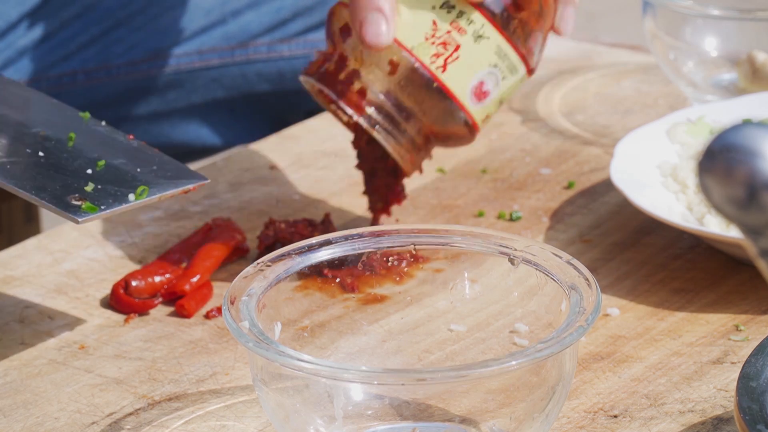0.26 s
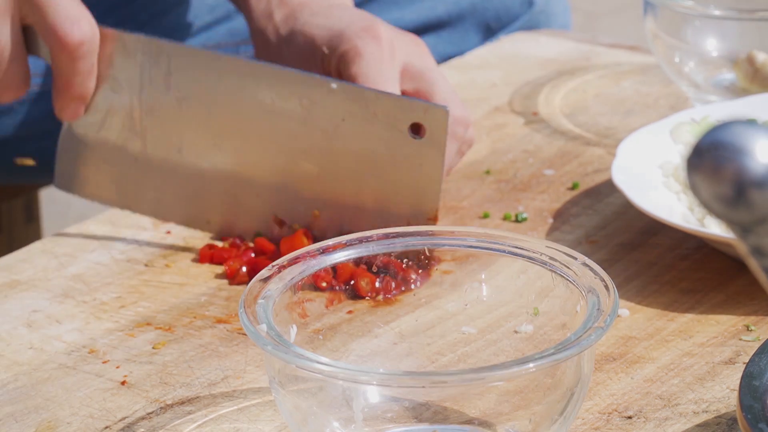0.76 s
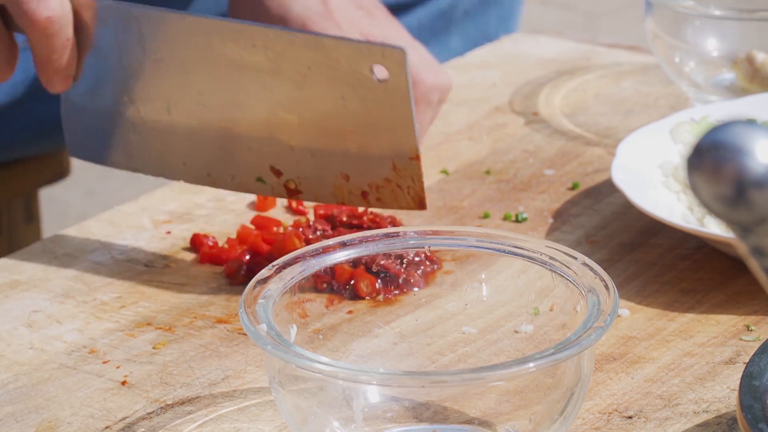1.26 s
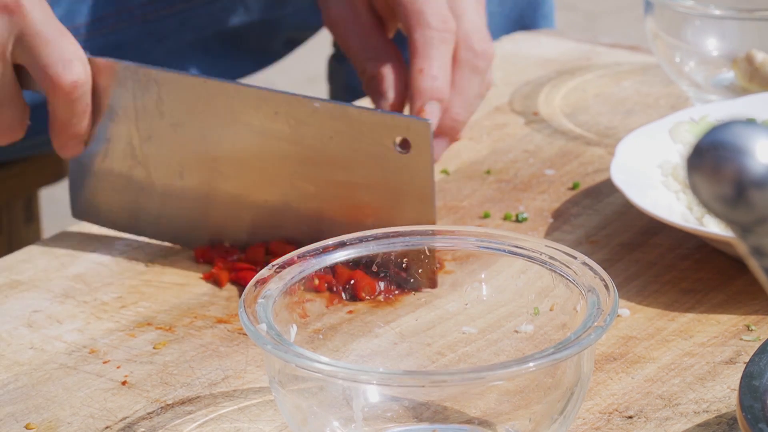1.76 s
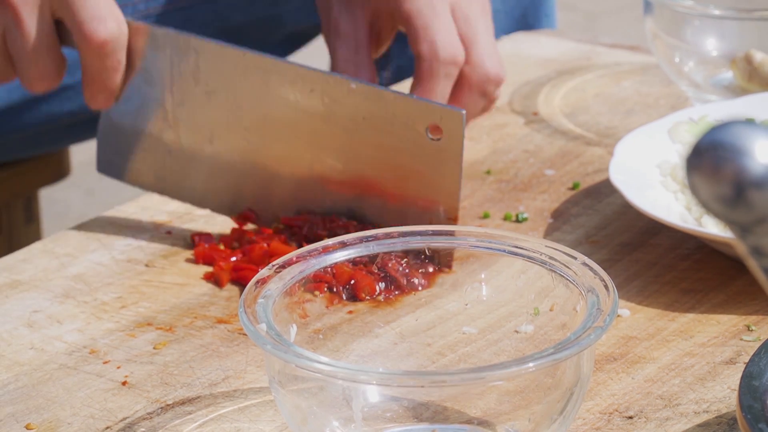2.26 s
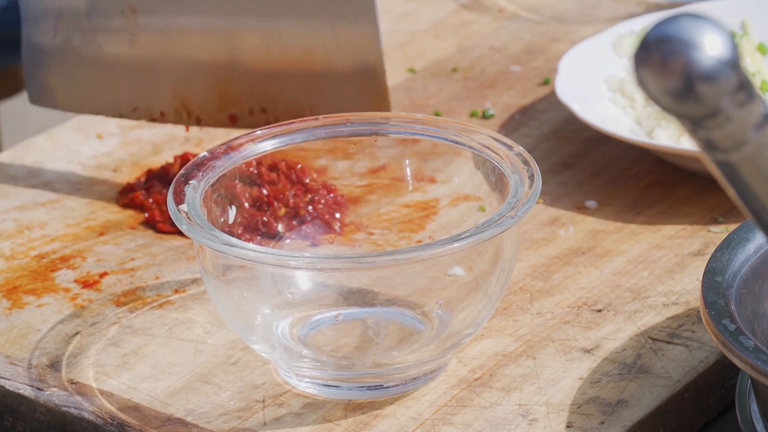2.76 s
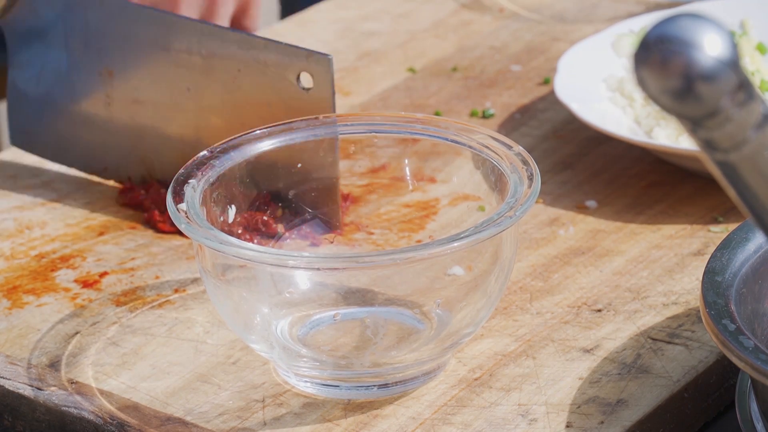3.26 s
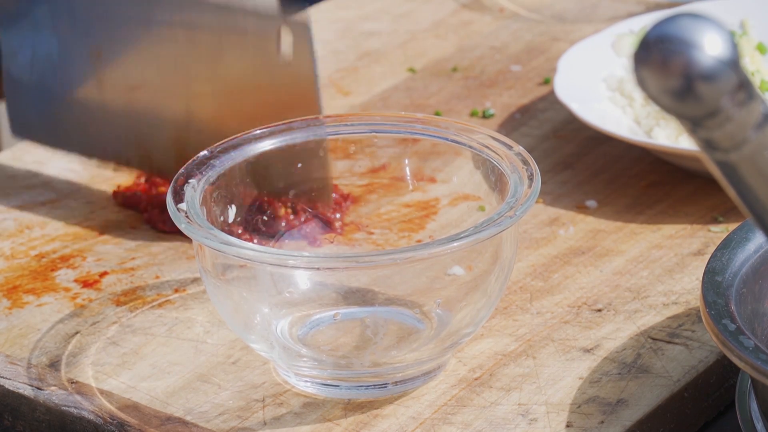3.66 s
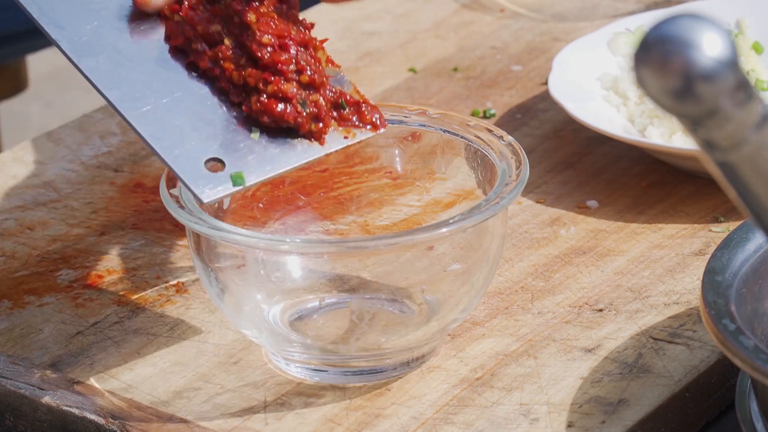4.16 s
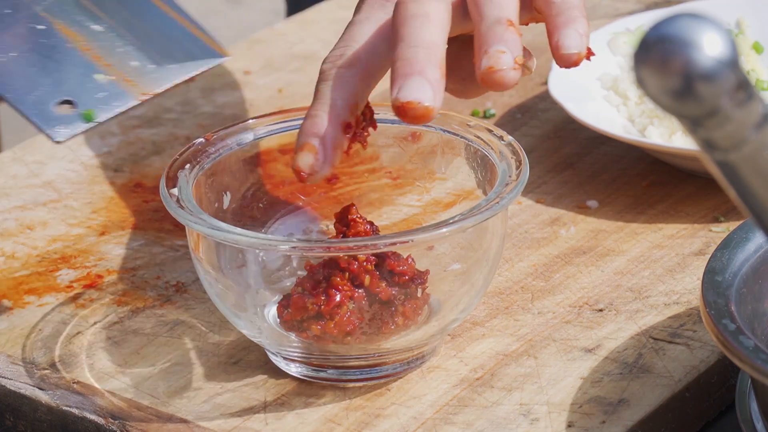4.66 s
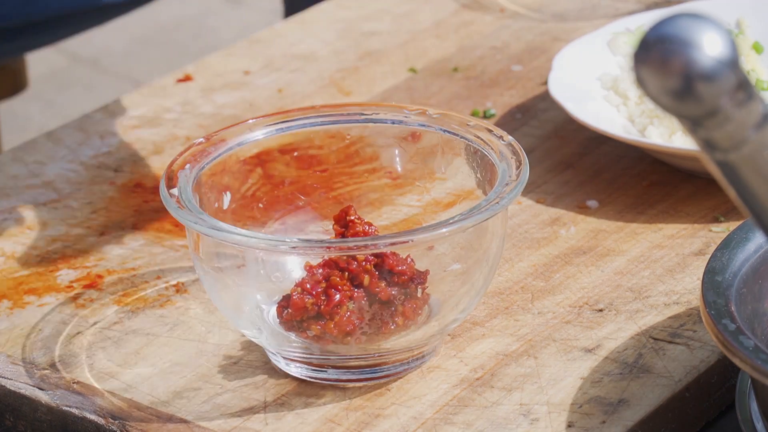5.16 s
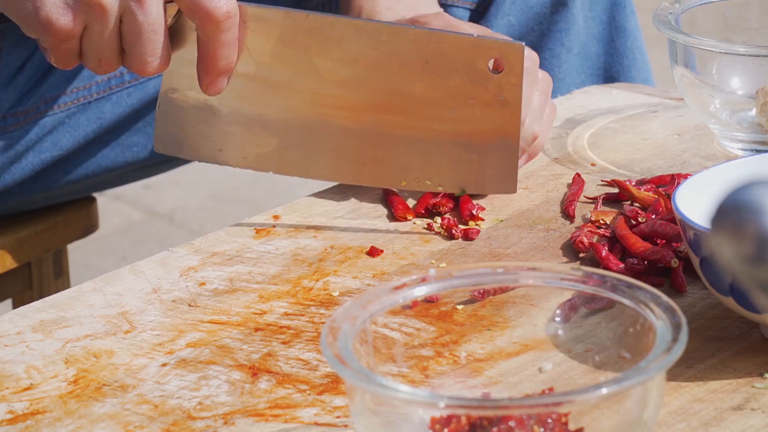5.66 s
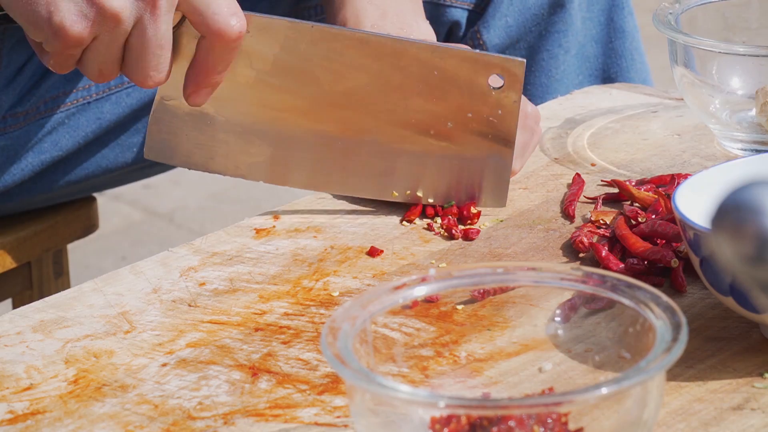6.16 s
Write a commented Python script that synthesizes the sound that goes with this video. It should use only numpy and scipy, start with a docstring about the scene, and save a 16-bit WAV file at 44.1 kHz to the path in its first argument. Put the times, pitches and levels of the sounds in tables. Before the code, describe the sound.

Close loud cleaver chops on a thick wooden board with wet crunches and rattling dishes, wind rumble, a short scrape, then a brittle snap.

```python
"""Outdoors, a jar is knocked twice to free its chili paste: glass and wood modes ring briefly. A steel cleaver
touches and rings, then chops the paste on a thick wooden board: decaying modes and noise bursts, echoed by a yard,
with ringing dishes, a thin clink and wet crackles of noise. Later the blade taps and scrapes the board (modulated
noise) and cuts a dried chili, whose pod snaps. Throughout, coloured noise makes wind and air; far birds call as
gliding sines, and stray clicks sound. The loudest swings overload the microphone."""
import sys
import numpy as np
from scipy import signal
from scipy.fft import rfft, irfft, next_fast_len
from scipy.io import wavfile

SR = 44100
rng = np.random.default_rng(int(sys.argv[2]) if len(sys.argv) > 2 else 0)


def dump_mix(stems):
    """Bounce the given channels to the path in sys.argv[1] as a 16-bit WAV at rate SR."""
    frames = np.atleast_2d(stems).T  # one column per channel
    limited = np.clip(frames, -1, 1)  # hard clip at full scale
    pcm = np.round(limited * 32767).astype(np.int16)
    wavfile.write(sys.argv[1], SR, pcm)


N = 282681
TIME = np.arange(N) / SR   # time in the scene [s]
AGE = TIME[:SR // 2]       # time since the start of one event [s]

# dishes standing on the board: (frequency [Hz], relative level [dB], t60 [s])
DISH_MODES = [(240.3, -28, 0.22), (383, -31.5, 0.27), (447.5, -20.5, 0.13), (575, -28, 0.25),
              (787, -26, 0.18), (853, -26, 0.59), (987, -23.5, 0.19), (1260, -30.5, 0.46),
              (1520, -42.5, 0.9), (1613, -30.5, 1.1), (1725, -31.5, 0.34), (2120, -39.5, 0.19)]
# spectrum of wet flesh and fine ticks: (frequency [Hz], relative density [dB per Hz])
CRUNCH = [(800, -19), (2000, 7), (4000, 0), (8000, 3), (11000, -6.5), (15000, -1)]
# spectrum of a dull crack: (frequency [Hz], relative density [dB per Hz])
CRACK = [(500, 4.5), (1500, 11), (3000, 3.5), (5000, -5), (8500, -15), (11000, -19), (15000, -43)]


def from_db(db):
    """Amplitude gain is the exponential of a level: 20 dB is a factor of ten."""
    return 10 ** (np.asarray(db) / 20)


def rms_one(x):
    """Normalization to unit mean power."""
    return x / np.sqrt(np.mean(x ** 2) + 1e-20)


def gains_in_time(rows):
    """Envelopes: each level column, interpolated linearly in dB, becomes a gain per sample."""
    s, *columns = np.transpose(rows)
    return [from_db(np.interp(TIME, s, column)) for column in columns]


def coloured(x, spectrum):
    """Linear filtering: weights the Fourier components by a spectrum drawn over log frequency; rms 1."""
    hz, db = np.transpose(spectrum)
    size = next_fast_len(len(x))
    bins = np.maximum(np.arange(size // 2 + 1) * SR / size, 1)
    weight = from_db(np.interp(np.log(bins), np.log(hz), db))
    return rms_one(irfft(rfft(x, size) * weight, size)[:len(x)])


def noise(spectrum, size):
    """Stationary random noise with a given spectrum; rms 1."""
    return coloured(rng.standard_normal(size), spectrum)


def grains(size, spread_db):
    """Fracture as impulsive noise: short runs of noise of very uneven strength; rms 1."""
    strength = np.repeat(rng.standard_normal(size // 16 + 1), 16)[:size]   # new strength every 16 samples
    strength_db = min(spread_db, 8) * np.clip(strength, -2, 2)
    return rms_one(rng.standard_normal(size) * from_db(strength_db))


def decay(t60):
    """Exponential damping: falls 60 dB in t60 seconds."""
    return np.exp(-np.log(1000) * AGE / max(t60, 1e-3))


def struck(modes, uneven_db, detune):
    """Modal synthesis: a blow excites damped sines whose strength and tuning depend on where it lands."""
    chance = rng.standard_normal((len(modes), 2))
    out = np.zeros(len(AGE))
    for k, ((hz, db, t60), (stronger, sharper)) in enumerate(zip(modes, chance)):
        sine = np.sin(2 * np.pi * hz * (1 + detune * sharper) * AGE)
        polarity = (-1) ** k
        out += polarity * from_db(db + uneven_db * stronger) * decay(t60) * sine
    return out


def add(track, s, sound):
    """Superposition: mixes in a sound that starts at s seconds."""
    start = max(round(s * SR), 0)
    track[start:start + len(sound)] += sound[:len(track) - start]


def yard(x, level_db):
    """Diffuse reflection from walls some metres away: convolution with shaped noise of unit energy."""
    # spectrum of the echo: (frequency [Hz], relative density [dB per Hz])
    echo_spectrum = [(100, 4), (250, 2), (450, -3.5), (800, -1.5), (1300, -4.5), (2000, -0.5), (3500, -8),
                     (7000, -12.5), (15000, -5)]
    # the echo starts strong, swells again from the far walls and dies away: (delay [s], relative level [dB])
    echo_shape = [(0.004, 5.5), (0.014, -1.5), (0.03, 1), (0.046, 3), (0.08, -2.5), (0.13, -14),
                  (0.2, -27.5), (0.45, -54)]
    s, db = np.transpose(echo_shape)
    response = noise(echo_spectrum, len(AGE)) * from_db(np.interp(AGE, s, db))
    return from_db(level_db) * signal.fftconvolve(x, response / np.linalg.norm(response))[:len(x)]


def crackle():
    """Wet fracture: a short decaying burst of grains from skins and seeds; rms 1 before its decay."""
    size = SR // 8
    return coloured(grains(size, spread_db=4.5), CRUNCH) * decay(0.038)[:size]


def chopping(crunch_s=.01, bite_s=0.00048, settle_s=0.0042, settle_db=-4):
    """Impact excitation: flesh crunches, wood cracks and thuds, dishes shake, and the blade lifts off."""
    # chops: (time [s], force [dB], flesh under the edge [dB])
    chops = [(0.7559, -0.5, 12.5), (0.976, 0.5, 2.5), (1.183, -2.5, 11), (1.402, -1.5, 12),
             (1.6219, -1, 7.5), (1.8294, 0, 5.5), (2.0513, -3.5, 0), (2.265, -2, 0), (2.496, -2, 2),
             (2.6688, -2, -3), (2.888, -1, -0.5), (3.1015, -2, -14), (3.3207, -3, 3), (3.534, -1.5, 1.5),
             (3.7466, 0, 3), (3.9481, 0.5, -5), (4.1572, 6, 3.5)]
    # the board's deep modes: (multiple of the board pitch, relative level [dB], t60 [s])
    thud_modes = [(0.518, -16, 0.13), (0.998, 2, 0.04), (1.222, -2.5, 0.031)]
    # the board's upper modes: (frequency [Hz], relative level [dB], t60 [s])
    knock_modes = [(787.5, 0.5, 0.022), (1054, -3, 0.019), (1285, -4, 0.02), (1651, -14.5, 0.014),
                   (2085, -20, 0.026), (2645, -27, 0.02)]
    # the whole board bumping on its support: (frequency [Hz], relative level [dB], t60 [s])
    bump_modes = [(81.5, -17, 0.032), (131, -24.5, .06)]
    board_hz, board_scatter = 456, 0.0086   # mean pitch, and its share of change from spot to spot
    # levels at force 0 dB; flesh lowers the knock and raises the crunch
    thud_db, knock_db, crack_db, crunch_db, echo_db, dishes_db = -1, 0, -12, -33, -6.5, -1.5
    cushion = 0.21   # dB of knock lost per dB of flesh
    lift_s, lift_db = .049, -42.5   # the blade comes unstuck from the paste this long after each chop
    chopping_ends_s = 4.1592
    out = np.zeros(N)
    for s, force_db, flesh_db in chops:
        pitch_hz = board_hz * (1 + board_scatter * rng.standard_normal())
        deep_modes = [(k * pitch_hz, db, t60) for k, db, t60 in thud_modes]
        thud = -struck(deep_modes, uneven_db=1.2, detune=.008)
        knock = struck(knock_modes, uneven_db=2, detune=.04)
        # one end of the edge lands first, the rest settles a moment later
        settling = from_db(settle_db) * struck(knock_modes, uneven_db=3.0, detune=0.022)
        add(knock, settle_s * rng.uniform(0.714, 1.27), settling)
        onset = 1 - np.exp(-AGE / bite_s)
        board = (from_db(thud_db) * thud + from_db(knock_db - cushion * flesh_db) * knock) * onset
        blow = board + from_db(crack_db) * noise(CRACK, len(AGE)) * decay(0.016)
        dishes = from_db(dishes_db) * struck(DISH_MODES, uneven_db=5.0, detune=0.002)
        bump = struck(bump_modes, uneven_db=3, detune=.08)
        add(out, s, from_db(force_db) * (blow + yard(blow, level_db=echo_db) + dishes + bump))
        # the crunch dips, then peaks as the edge reaches the wood
        pressing = np.interp(AGE, [0, crunch_s / 2, crunch_s, crunch_s + 0.0023], [0.38, 0.025, 1.62, 0])
        crunch = pressing * coloured(grains(len(AGE), spread_db=4.5), CRUNCH)
        add(out, s - crunch_s, from_db(crunch_db + flesh_db) * crunch)
        add(out, s + lift_s, from_db(lift_db + force_db) * crackle())
    # all sound of the chopping breaks off abruptly just after the last chop begins
    return out * np.clip((chopping_ends_s - TIME) / .001, 0, 1)


def steel(tick_db=-20, sizzle_db=0):
    """Free vibration of a plate: the blade rings as it is touched; a thin clink adds a bright sizzle."""
    # touches: (time [s], blade level [dB], its two lowest modes [dB re blade], dishes level [dB])
    touches = [(0.627, -25.5, -14, -8.5), (0.755, -18, -1, -22), (0.8058, -4, 0, -17)]
    # cleaver blade: (frequency [Hz], relative level [dB], t60 [s])
    blade_modes = [(2385, -43, 0.2), (2766, -14, 0.25), (2917, -16.5, 0.5), (3983, -4.5, 0.06),
                   (5360, -28, 0.11), (5895, -24, 0.061), (7680, -39.5, 0.13), (8586, -41, 0.14),
                   (9250, -33.5, 0.06), (10970, -30, 0.048)]
    # a thin bright clink of steel: (time [s], level [dB])
    clink = (1.537, -23.5)
    # its modes: (frequency [Hz], relative level [dB], t60 [s])
    clink_modes = [(5280, -11, 0.37), (5700, -2, 0.14), (6100, -18, 0.15), (6650, -4, 0.15),
                   (7250, -9, 0.17), (8100, -1, 0.11), (8640, -1, 0.073), (12000, -3, 0.079),
                   (13100, -7, 0.09)]
    out = np.zeros(N)
    for s, blade_db, low_db, dishes_db in touches:
        tick = from_db(tick_db) * noise(CRUNCH, len(AGE)) * decay(0.019)
        low = struck(blade_modes[:2], uneven_db=.3, detune=0)
        high = struck(blade_modes[2:], uneven_db=.3, detune=0)
        add(out, s, from_db(blade_db) * (from_db(low_db) * low + high + tick))
        add(out, s, from_db(dishes_db) * struck(DISH_MODES, uneven_db=0, detune=0.00054))
    clink_s, clink_db = clink
    sizzle = noise([(4600, -41), (5600, 3), (8500, -6), (15000, -13)], len(AGE)) * decay(0.16)
    ring = struck(clink_modes, uneven_db=1, detune=0)
    add(out, clink_s, from_db(clink_db) * (ring + from_db(sizzle_db) * sizzle))
    return out


def jar(lead_s=0.0037, lag_s=0.00313, thud_db=0, bounce_s=0.01196, bounce_db=-22, squelch_db=-13):
    """Coupled impact: paste shifts, the rim ticks, the jar's weight thuds into the wood and bounces once."""
    # knocks on the board: (time [s], rim level [dB], paste shifting inside [dB])
    knocks = [(0.189, -12, -23.5), (0.4012, -14.5, -35.5)]
    # the jar's glass rim: (frequency [Hz], relative level [dB], t60 [s])
    rim_modes = [(1150, -2, 0.0086), (1372, -1, 0.044), (1700, 3, 0.016), (2250, -1.5, 0.022),
                 (3250, -8, 0.015)]
    # the board under the jar: (frequency [Hz], relative level [dB], t60 [s])
    jar_thud_modes = [(239, -16.5, 0.11), (340, -46, 0.05), (480, -2, 0.048), (568, -4.5, 0.052),
                      (760, -3.5, 0.021)]
    out = np.zeros(N)
    for s, rim_db, paste_db in knocks:
        squelch = from_db(squelch_db) * noise(CRACK, len(AGE)) * decay(0.095)
        knock = from_db(rim_db) * (struck(rim_modes, uneven_db=-0.5, detune=0.023) + squelch)
        onset = 1 - np.exp(-AGE / 0.00089)
        thud = from_db(thud_db) * struck(jar_thud_modes, uneven_db=0.7, detune=0.019) * onset
        add(knock, lag_s, thud)
        add(knock, bounce_s, from_db(bounce_db) * thud)
        add(out, s, knock + yard(knock, level_db=-26.5))
        add(out, s - lead_s, from_db(paste_db) * crackle())
    return out


def chilies(hollow_db=-7):
    """Ductile and brittle fracture: wet flesh crackles; a dry pod rustles and snaps with a brief ring."""
    # paste squelching as it is pushed about and wiped into the bowl: (time [s], level [dB])
    squelches = [(1.8142, -29), (2.0394, -26), (2.1765, -36.5), (2.3136, -34), (2.3886, -39), (2.8775, -34),
                 (4.1414, -39), (4.477, -38.5), (4.529, -43.5), (4.619, -45)]
    # the edge sinking through the dry skin: (time [s], level [dB])
    slices = [(5.853, -42), (6.092, -39), (6.256, -31)]
    # dried chili snapping: (time [s], level [dB])
    snaps = [(5.816, -39), (6.0697, -41), (6.2137, -26), (6.222, -23.5), (6.237, -20), (6.2476, -14.5),
             (6.2547, -19.5)]
    # spectrum of brittle fracture: (frequency [Hz], relative density [dB per Hz])
    brittle = [(200, -25), (450, 3), (810, -13), (1150, -14), (1690, 1.5), (2300, -6.5), (3220, -4.5),
               (5000, -12.5), (10000, -17.5), (16000, -18)]
    # the dry pod under the edge: (frequency [Hz], relative level [dB], t60 [s])
    pod_modes = [(825, -2.5, 0.094), (1720, -8, 0.052), (3290, 7, 0.016)]
    # fresh skins and seeds pop at random until they are minced
    pops_from_s, pops_until_s, pop_count, softest_pop_db, pop_range_db = 0.93, 2, 6, -46, 8
    slice_t60_s, snap_t60_s = 0.21, 0.021
    out = np.zeros(N)
    for when, size in rng.random((pop_count, 2)):
        pop_s = pops_from_s + when * (pops_until_s - pops_from_s)
        add(out, pop_s, from_db(softest_pop_db + pop_range_db * size) * crackle())
    for s, db in squelches:
        add(out, s, from_db(db) * crackle())
    for s, db in slices:
        rustle = coloured(grains(len(AGE), spread_db=5), brittle) * decay(slice_t60_s)
        add(out, s, from_db(db) * rustle)
    for s, db in snaps:
        splinters = coloured(grains(len(AGE), spread_db=5), brittle) * decay(snap_t60_s)
        hollow = from_db(hollow_db) * struck(pod_modes, uneven_db=3, detune=.08)
        add(out, s, from_db(db) * (splinters + hollow))
    return out


def pressure(full_s):
    """Exponential swell and release: gain of the scraping stroke, 1 while the blade bears down fully."""
    hold_s, swell_db_per_s, release_db_per_s = 0.052, 225, 461
    early = np.maximum(full_s - TIME, 0)
    late = np.maximum(TIME - full_s - hold_s, 0)
    return from_db(-swell_db_per_s * early - release_db_per_s * late)


def blade_on_board(ring_db=-25, after_ring_db=-4, tick_db=-14):
    """Stick-slip friction: after two taps the edge drags over the grain; slips hiss, rasp and ring the steel."""
    # blade set down on the board twice, and lifted off after the stroke: (time [s], level [dB])
    taps = [(5.1736, -13.5), (5.2645, -7.5), (5.551, -25)]
    # blade held against the wood: (frequency [Hz], relative level [dB], t60 [s])
    contact_modes = [(243, -6, 0.12), (700, -2, 0.035), (1330, -1.5, 0.034), (1900, -12, 0.036),
                     (2230, -12, 0.025), (2720, -22, 0.024), (3560, -37, 0.025), (4220, -18, 0.023),
                     (4600, -30, 0.03), (5340, -16, 0.024), (6700, -20, 0.034), (7450, -18, 0.016),
                     (8600, -26, 0.037), (10140, -22, 0.018), (12000, -25, 0.015), (13600, -25, 0.015)]
    # the steel while its edge rests on the board: (frequency [Hz], relative level [dB], t60 [s])
    pressed_blade_modes = [(1352, -19.5, 0.1), (3430, -33, 0.13), (4555, -35, 0.15), (4640, -30, 0.12),
                           (5290, -38, 0.12), (6665, -34, 0.078), (6760, -33, 0.12), (7650, -35, 0.1),
                           (8550, -29, 0.13), (8900, -36, 0.09), (10170, -35.5, 0.1), (13450, -37, 0.08)]
    # flutter of the edge as it catches and slips: (frequency [Hz], relative density [dB per Hz])
    catching = [(10, -8), (70, 7), (250, -29), (1000, -60)]
    # hiss of the edge: (frequency [Hz], relative density [dB per Hz])
    edge_hiss = [(1800, -36), (3400, 4), (4700, -11), (5800, -1), (6700, 11), (7600, 4), (8700, 8),
                 (10500, -4.5), (13300, 2.5), (16000, -18)]
    # rasp of the wood: (frequency [Hz], relative density [dB per Hz])
    wood_rasp = [(110, -41), (180, -2), (323, -11.5), (549, -5.5), (634, -13), (800, -3), (923, -11.5),
                 (1530, -9.5), (1990, -10), (2750, -20), (4000, -24), (5200, -25.5), (8800, -120)]
    scrape_full_s, rasp_lag_s = 5.43, 0.021   # the wood rasps a little after the edge hisses
    hiss_db, rasp_db, catch_db = -24.5, -14.5, 1.5   # catch_db is the rms depth of the flutter
    out = np.zeros(N)
    singing = struck(pressed_blade_modes, uneven_db=0, detune=0)
    for s, db in taps:
        tick = from_db(tick_db) * noise(CRACK, len(AGE)) * decay(0.073)
        knock = struck(contact_modes, uneven_db=1, detune=.003)
        add(out, s, from_db(db) * (knock + tick + from_db(after_ring_db) * singing))
    edge, wood = pressure(scrape_full_s), pressure(scrape_full_s + rasp_lag_s)
    slips = grains(N, spread_db=3.5) * from_db(catch_db * noise(catching, N))
    ringing = rms_one(signal.fftconvolve(slips, singing)[:N])
    # the steel's singing swells with the pressure, but less steeply than the hiss, so it stands out most under
    # a light touch
    sing = from_db(ring_db) * edge ** .8 * ringing
    hiss = from_db(hiss_db) * edge * coloured(slips, edge_hiss)
    rasp = from_db(rasp_db) * wood * coloured(slips, wood_rasp)
    after_second_tap = TIME > taps[1][0]
    return out + (hiss + sing + rasp) * after_second_tap


def clicks():
    """Impulse with exponential decay: lone sharp dry clicks."""
    # clicks: (time [s], level [dB])
    click_times = [(2.559, -0.5), (5.725, -22.5)]
    out = np.zeros(N)
    for s, db in click_times:
        add(out, s, from_db(db) * decay(0.0079))
    return out


def birds(waver_hz=260):
    """Frequency modulation: thin far-off calls sag in pitch and waver at random, smeared by the distance."""
    # distant birds: (time [s], length [s], first frequency [Hz], level [dB])
    calls = [(0.387, 0.13, 4400, -50), (3.158, 0.1, 4650, -54), (5.833, 0.07, 6650, -53),
             (6.167, 0.078, 4600, -52)]
    sag_hz_per_s = 1700
    out = np.zeros(N)
    for s, length_s, first_hz, db in calls:
        along = np.clip(AGE / length_s, 0, 1)
        waver = waver_hz * noise([(300, 2), (2000, -28)], len(AGE))
        hz = first_hz - sag_hz_per_s * AGE + waver
        tone = np.sin(2 * np.pi * np.cumsum(hz) / SR)
        add(out, s, from_db(db) * np.sin(np.pi * along) * tone)
    return out


def outdoors(rumble_db=3.5, buffet_db=2, low_db=-2.0, hiss_db=-1):
    """Turbulent pressure noise: gusts rumble and buffet on the microphone over a soft open-air hush."""
    # wind on the microphone: (time [s], relative rumble level [dB], relative buffeting level [dB])
    wind = [(0.05, -16.5, -43.5), (0.37, -30, -44.5), (0.44, -35, -44), (0.58, -19.5, -43),
            (0.81, -40.5, -49), (1.5, -42, -51), (1.87, -34.5, -45), (2.01, -12, -41), (2.26, -12, -27.5),
            (2.37, -9, -26), (2.56, -15, -37), (2.62, -32.5, -43), (2.99, -26, -49), (3.02, -35, -51),
            (3.47, -34, -51), (3.63, -46, -57), (4.09, -41, -50), (4.18, -25.5, -51.5), (4.53, -16, -43),
            (4.69, -21, -36), (5.04, -16.5, -26.5), (5.17, -31, -34), (5.2, -15, -28.5), (5.5, -24.5, -31),
            (5.72, -19, -42), (5.74, -26, -44), (6.02, -29.5, -55), (6.41, -37, -46)]
    # outdoor background: (time [s], relative low level [dB], relative hiss level [dB])
    air = [(0, -42, -66), (0.61, -48, -63.5), (0.65, -35.5, -50.5), (2.1, -37.5, -53), (2.6, -40, -63),
           (4.3, -44.5, -59), (5.65, -42.5, -62), (6.41, -41.5, -52)]
    # wind rumble: (frequency [Hz], relative density [dB per Hz])
    rumble_spectrum = [(4, -11.5), (10, 5.5), (20, -2), (35, -6.5), (60, -19.5), (110, -45), (200, -80)]
    # wind buffeting: (frequency [Hz], relative density [dB per Hz])
    buffet_spectrum = [(35, -9.5), (70, 2.5), (110, -0.5), (160, -5.5), (220, -20), (500, -48), (1000, -77)]
    # low part of the air: (frequency [Hz], relative density [dB per Hz])
    low_spectrum = [(100, -9.5), (250, 0.5), (550, 1), (1100, -5), (2000, -15), (4000, -30.5),
                    (9000, -39.5)]
    # high part of the air: (frequency [Hz], relative density [dB per Hz])
    hiss_spectrum = [(1200, -7), (2500, 8.5), (5000, 5), (8500, 2.5), (11000, -6), (16000, -15)]
    ceiling = .9   # the strongest gusts level off at this swing
    gust, flutter = gains_in_time(wind)
    low_gain, hiss_gain = gains_in_time(air)
    swing = from_db(rumble_db) * gust * noise(rumble_spectrum, N)
    rumble = ceiling * np.tanh(swing / ceiling)
    buffet = from_db(buffet_db) * flutter * noise(buffet_spectrum, N)
    low = from_db(low_db) * low_gain * noise(low_spectrum, N)
    hiss = from_db(hiss_db) * hiss_gain * noise(hiss_spectrum, N)
    return rumble + buffet + low + hiss


def scene():
    """Superposition of all sources at one microphone beside the board."""
    on_board = chopping() + steel() + jar() + chilies() + blade_on_board()
    return (on_board + clicks() + birds() + outdoors())[None]


def record(dry):
    """Saturation and band limiting: swings flatten at full scale, then a steep low-pass cuts the top."""
    flattened = dry / (1 + dry ** 20) ** (1 / 20)
    cutoff_hz = 15900
    low_pass = signal.ellip(10, .1, 80, cutoff_hz, fs=SR, output="sos")
    return signal.sosfilt(low_pass, flattened)


dry = scene()
out = record(dry)
dump_mix(out)
```